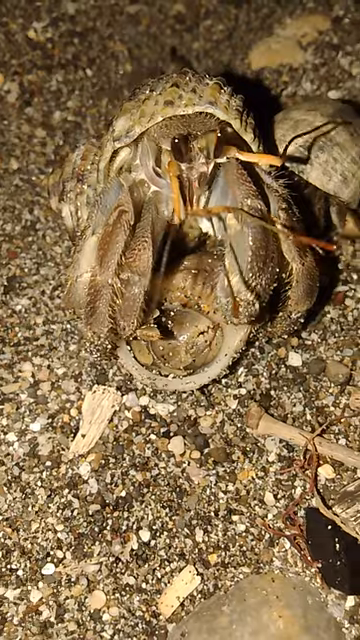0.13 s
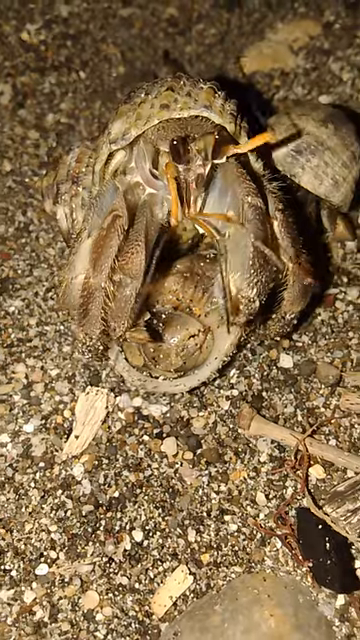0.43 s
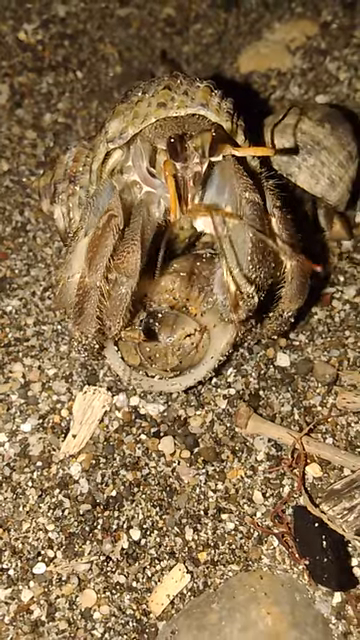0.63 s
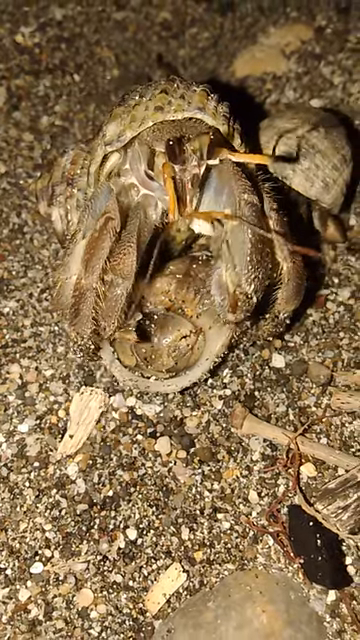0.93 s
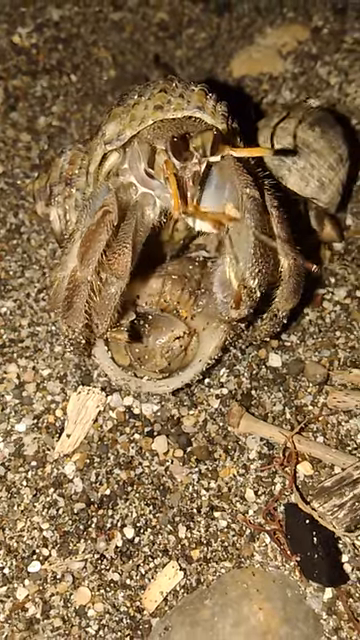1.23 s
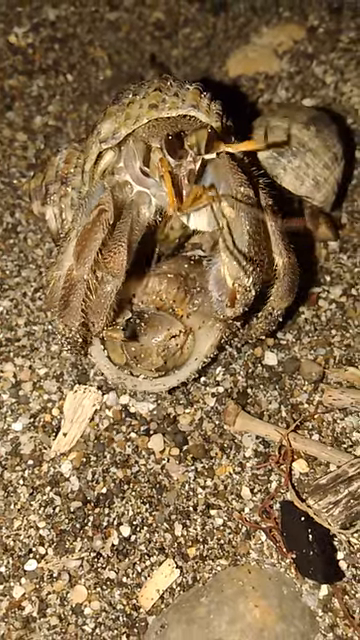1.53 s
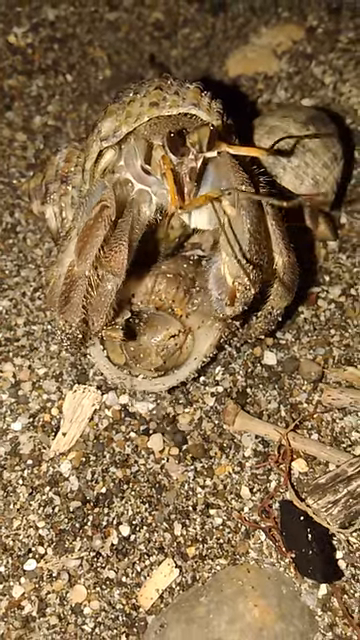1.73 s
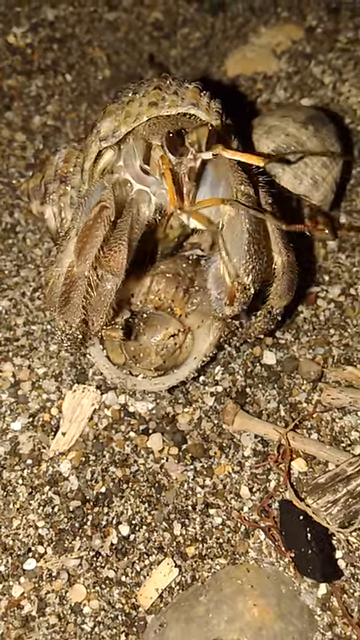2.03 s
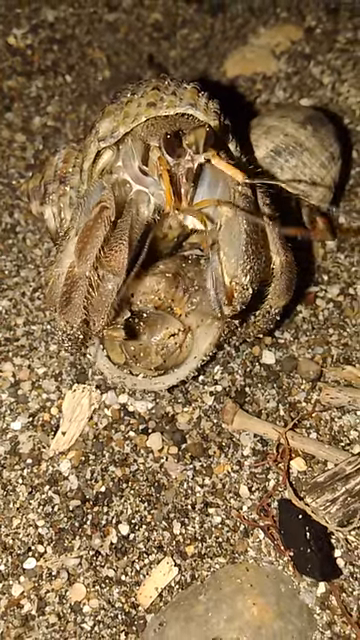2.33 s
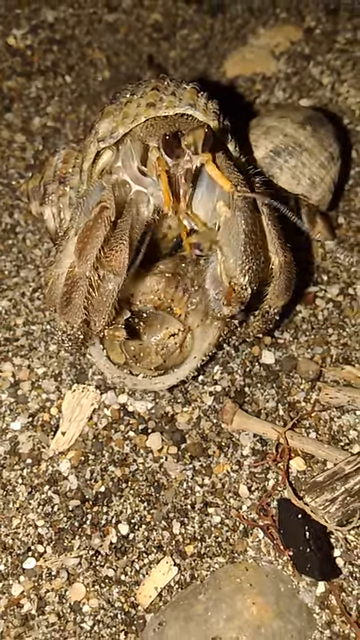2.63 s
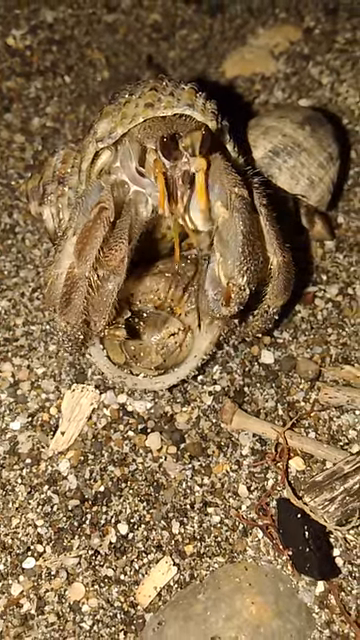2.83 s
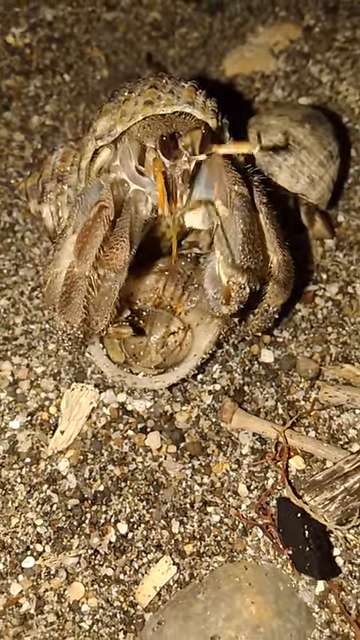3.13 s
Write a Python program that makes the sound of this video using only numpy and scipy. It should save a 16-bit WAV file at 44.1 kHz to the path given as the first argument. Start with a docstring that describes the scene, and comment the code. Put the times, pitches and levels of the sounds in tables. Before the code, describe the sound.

Small surf some way off drains, washes and builds toward a new wave at the end, over a distant low engine drone and faint high crickets; a few tiny crab ticks close to the microphone, outdoors.

```python
"""Small surf on a beach at night

Some way off one wave drains, a wash follows and the next wave builds: shaped noise that roars, hisses and slaps.
A distant engine drones low under it as a set of wavering sines, over a bed of low noise.
Crickets behind the sand pulse faintly as short falling tones over a merged chorus.
A hermit crab close to the microphone makes a few tiny ticks, filtered clicks, and one brief scrape of noise."""
import sys
import numpy as np
from scipy import signal
from scipy.fft import rfft, irfft, next_fast_len
from scipy.io import wavfile
from scipy.ndimage import uniform_filter1d, map_coordinates

SR = 44100
rng = np.random.default_rng(int(sys.argv[2]) if len(sys.argv) > 2 else 0)


def store_wav(level_fs):
    """Save 16-bit WAV to argv[1]."""
    pcm = np.round(np.clip(np.atleast_2d(level_fs), -1, 1) * 32767)
    wavfile.write(sys.argv[1], SR, pcm.T.astype(np.int16))


N = 144207  # length in samples
T = np.arange(N) / SR  # time in seconds


def amp(db):
    """Linear gain from dB."""
    return 10 ** (np.asarray(db) / 20)


def unit(x):
    """x scaled to an rms of 1."""
    return x / np.sqrt(np.mean(x ** 2) + 1e-20)


def curves(rows):
    """One value per sample for each column after the time."""
    seconds, *columns = np.transpose(rows)
    return [np.interp(T, seconds, column) for column in columns]


def wobble(rate):
    """A smooth random curve through normally distributed knots, rate knots a second."""
    knots = rng.standard_normal(int(N * rate / SR) + 4)
    return map_coordinates(knots, [np.arange(N) * rate / SR])


def filtered(x, response):
    """x times a response of frequency, padded so that its tail does not wrap round."""
    size = next_fast_len(N + SR // 2)
    gain = response(np.fft.rfftfreq(size, 1 / SR))
    return irfft(rfft(x, size) * gain, size)[..., :N]


def coloured(x, spectrum):
    """x through (Hz, dB) points on a log frequency axis."""
    f, db = np.transpose(spectrum)
    return filtered(x, lambda hz: amp(np.interp(np.log(hz + 1), np.log(f + 1), db)))


def rush(spectrum, patchy_db):
    """Noise of rms 1 with patches of random gain in time and frequency."""
    bins = signal.stft(rng.standard_normal(N), nperseg=512)[2]
    field = uniform_filter1d(rng.standard_normal(bins.shape), size=5, axis=0)  # across frequency
    field = uniform_filter1d(field, size=10, axis=1)  # across time
    patchy = signal.istft(bins * amp(patchy_db * unit(field)), nperseg=512)[1][:N]
    return unit(coloured(patchy, spectrum))


def surge(peak_s, rise_s, fall_s):
    """An exponential rise to 1 and an exponential decay, with their time constants."""
    return np.exp(-np.abs(T - peak_s) / np.where(T < peak_s, rise_s, fall_s))


# Colour of the low bed from sea and far engine. Each row: frequency in Hz, relative density in dB per Hz.
RUMBLE_SPECTRUM = [(4, -29), (18, -0.5), (32, 2), (48, -0.5), (70, 3.2), (105, 2.5), (135, 3.2), (190, 3),
                   (235, 1), (320, -4.5), (500, -12.5), (1200, -57.5)]
RUMBLE_DB = -56.5


def rumble():
    """The low bed of the sea and the far engine: dark noise with a slight sway in level."""
    return amp(RUMBLE_DB + 0.6 * wobble(4.6)) * rush(RUMBLE_SPECTRUM, patchy_db=1.17)


# Lines of the far engine's drone. Each row: multiple of the working cycle, level in dB before fading and beating.
ENGINE_LINES = [(4, -73.5), (8, -71.5), (10, -61), (11, -64.5), (12, -65.8), (12.26, -61.7), (12.9, -69),
                (14, -68.8), (15, -74.5), (18, -68.5), (20, -72), (22, -75)]
# Beating of the drone: swells and dips of its level. Each row: time in seconds, gain in dB.
BEATING = [(0.2, -2), (0.48, -0.5), (0.66, 1.5), (0.88, -0.5), (1.17, 2.5), (1.58, -1.5), (1.78, -1.5),
           (1.93, 1.5), (2.05, -2.5), (2.2, 0.5), (2.34, -10), (2.45, 0.5), (2.62, -2), (2.92, 0.5),
           (3.2, -1)]
CYCLE_HZ, SPEED_DRIFT = 15.27, 0.0021  # mean working cycle, drift as a fraction of it
LINE_FADE_DB, LINE_BLUR_RAD = 2.34, 0.35


def engine():
    """Low lines on one nearly steady speed, each fading and blurring on its long way; together they beat."""
    cycles = np.cumsum(CYCLE_HZ * (1 + SPEED_DRIFT * wobble(1.6))) / SR
    drone = np.zeros(N)
    for multiple, db in ENGINE_LINES:
        blur = LINE_BLUR_RAD * wobble(5.8)
        phase = 2 * np.pi * (multiple * cycles + rng.random()) + blur
        level = amp(db + LINE_FADE_DB * wobble(4.36))
        drone += np.sqrt(2) * level * np.sin(phase)
    beating_db, = curves(BEATING)
    return amp(beating_db) * drone


# Colour of many far insects merged. Each row: frequency in Hz, relative density in dB per Hz.
CHORUS_SPECTRUM = [(6000, -21), (6350, -1.5), (6800, -1), (7250, -1), (7550, -9.5), (8000, -11), (8450, -6),
                   (9000, -27), (10000, -37)]
CHORUS_DB = -84


def chorus():
    """Many far insects merge into a band of high noise."""
    return amp(CHORUS_DB + 0.42 * wobble(35)) * rush(CHORUS_SPECTRUM, patchy_db=0.5)


# Runs of cricket chirps behind the sand.
# Each row: first chirp's centre in seconds, end in seconds, period in seconds, mid-chirp pitch in Hz,
# mean level in dB at the height of a chirp, before the bushes' echo.
CHIRP_RUNS = [(0.104, 1.42, .1178, 6570, -82.5), (1.463, 3.26, .1197, 6560, -81.3),
              (0.055, 3.26, .1118, 6740, -83.3)]
CHIRP_S, FALL_HZ_PER_S = .032, 14000
CHIRP_SCATTER_DB, RASP_RAD = .4, .8  # random level and phase
BUSH_T60_S, BUSH_DB = .11, -8  # the echo's 60 dB decay time and its gain


def crickets():
    """Each wing stroke is a short falling tone, scattered by the bushes as a decaying noise echo."""
    song = np.zeros(N)
    for start, end, period, chirp_hz, db in CHIRP_RUNS:
        stroke = np.round((T - start) / period)
        centre = start + stroke * period
        singing = (stroke >= 0) * (centre < end)
        u = T - centre
        swell = np.cos(np.pi * np.clip(u / CHIRP_S, -.5, .5)) ** 2 * singing
        rasp = RASP_RAD * wobble(500)
        phase = 2 * np.pi * (chirp_hz * u - FALL_HZ_PER_S * u ** 2 / 2) + rasp
        level = amp(db + CHIRP_SCATTER_DB * wobble(3.9))
        song += np.sqrt(2) * level * swell * np.sin(phase)
    age = T[:SR // 2]
    tail = rng.standard_normal(len(age)) * np.exp(-np.log(1000) * age / BUSH_T60_S)
    echo = signal.fftconvolve(song, tail / np.linalg.norm(tail))[:N]
    return song + amp(BUSH_DB) * echo


# Ticks of shell on sand, close to the microphone. Each row: time in seconds, peak level in dB.
TICKS = [(0.62, -59), (1.0245, -55), (1.72, -61)]
# Colour of a tick. Each row: frequency in Hz, relative level in dB.
TICK_SPECTRUM = [(1500, -16), (4200, 3), (5800, 1), (6700, -5), (7800, 8), (10000, -7), (12500, -23),
                 (15500, -11)]
# A leg dragging over the sand. Each row: centre in seconds, half length (Gaussian sigma) in seconds, level in dB.
SCRAPES = [(1.021, .008, -76)]
# The shell's ring in a scrape. Each row: frequency in Hz, relative density in dB per Hz.
SCRAPE_SPECTRUM = [(3000, -25), (3900, -4), (4250, 0), (4800, -12), (6500, -35)]


def crab():
    """Dry, very short ticks of shell against sand grains, and a brief scrape of ringing noise."""
    ticks = np.zeros(N)
    for s, db in TICKS:
        click = 1. * (np.arange(N) == round(s * SR))
        tick = coloured(click, TICK_SPECTRUM)
        ticks += amp(db) * tick / np.abs(tick).max()
    drag = sum(amp(db) * np.exp(-.5 * ((T - s) / length) ** 2) for s, length, db in SCRAPES)
    return ticks + drag * unit(coloured(rng.standard_normal(N), SCRAPE_SPECTRUM))


# Water slapping down. Each row: peak in seconds, level in dB at the peak, rise and fall time constants
# in seconds, centre frequency in Hz.
SPLASHES = [(0.18, -59, 0.015, 0.032, 430), (1.345, -69, 0.046, 0.084, 2200),
            (2.24, -59, 0.031, 0.024, 840), (2.87, -59.5, 0.0092, 0.022, 794),
            (3.02, -55.5, 0.024, 0.043, 1020), (3.18, -60, 0.036, 0.072, 1080)]
SPLASH_OCTAVES, SPLASH_GRAIN_DB = 0.48, 1.8  # sigma of the band, random roughness


def splashes():
    """Each slap of water is a short grainy surge of noise around its own pitch."""
    water = np.zeros(N)
    for s, db, rise, fall, centre_hz in SPLASHES:
        def band_gain(hz):
            octaves = np.log2((hz + 1) / centre_hz)
            return np.exp(-.5 * (octaves / SPLASH_OCTAVES) ** 2)
        band = filtered(rng.standard_normal(N), band_gain)
        grain = amp(SPLASH_GRAIN_DB * wobble(150))
        water += amp(db) * surge(s, rise, fall) * unit(band * grain)
    return water


# Waves collapsing. Each row: peak in seconds, level in dB at the peak, rise and fall time constants in seconds.
BREAKERS = [(0.165, -55, 0.14, 0.098), (2.97, -57, 0.28, 0.22)]
# Colour of a collapse. Each row: frequency in Hz, relative density in dB per Hz.
PLUNGE_SPECTRUM = [(80, -20), (170, -4), (260, 7), (450, 3.5), (600, -17), (1000, -6.5), (2500, -32),
                   (8000, -80)]


def breakers():
    """Each collapsing wave adds a dull swell of noise that rises and dies away."""
    level = sum(amp(db) * surge(s, rise, fall) for s, db, rise, fall in BREAKERS)
    return level * rush(PLUNGE_SPECTRUM, patchy_db=0.5)


# The waves some way off. Each row: time in seconds, roar in dB and foam hiss in dB, both before the trims.
WAVES = [(0.07, -58, -63), (0.2, -58.5, -65.5), (0.84, -63.5, -69.5), (0.97, -62, -69.5),
         (1.15, -59.5, -66.5), (1.75, -58.5, -65), (2.0, -58, -66), (2.38, -58.5, -65),
         (3.11, -54.5, -61.5), (3.24, -53, -60.5)]
ROAR_TRIM_DB, FOAM_TRIM_DB = -1, -1
# Colour of the tumbling water. Each row: frequency in Hz, relative density in dB per Hz.
ROAR_SPECTRUM = [(200, -25), (330, -3.5), (450, -1), (560, -0.5), (780, 1), (1150, -3.5), (1700, -9.5),
                 (3000, -31.5), (6000, -50.5)]
# Colour of the foam. Each row: frequency in Hz, relative density in dB per Hz.
FOAM_SPECTRUM = [(500, -25.5), (1000, -2.5), (1600, 0.5), (2300, -2.2), (3100, -7.5), (4200, -12.5),
                 (5400, -17), (7300, -20), (8400, -17.5), (9200, -23), (10200, -30.5), (12500, -44.5),
                 (15500, -43)]


def surf():
    """Tumbling water roars and its foam hisses; both churn together."""
    roar_db, foam_db = curves(WAVES)
    churn_db = 0.15 * wobble(24.96)
    roar = amp(roar_db + ROAR_TRIM_DB + churn_db) * rush(ROAR_SPECTRUM, patchy_db=0.8)
    foam = amp(foam_db + FOAM_TRIM_DB + churn_db) * rush(FOAM_SPECTRUM, patchy_db=0.13)
    return roar + foam


def scene():
    """Everything as it reaches one microphone just above the sand."""
    far = rumble() + engine() + chorus() + crickets()
    water = splashes() + breakers() + surf()
    return (far + crab() + water)[None]


SILENCE_S, TOP_HZ = .036, 15750  # length of the silence at the start, band limit
OFFSET = .0127  # constant, as a fraction of full scale


def record(dry):
    """A brief silence, then the sound on a small constant offset, with nothing kept above the band limit."""
    sounding = (dry + OFFSET) * (T >= SILENCE_S)
    return filtered(sounding, lambda hz: hz < TOP_HZ)


dry = scene()
out = record(dry)
store_wav(out)
```